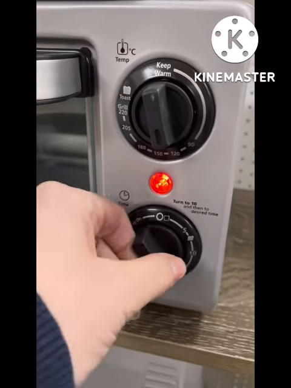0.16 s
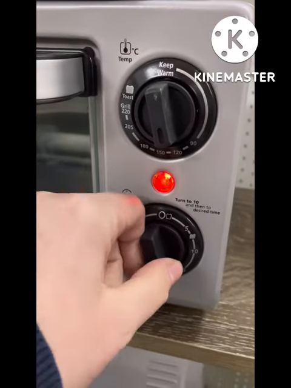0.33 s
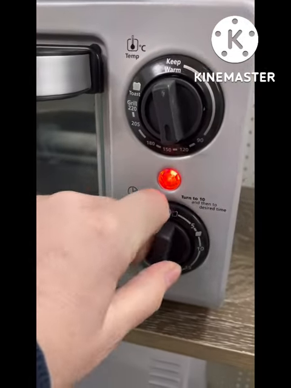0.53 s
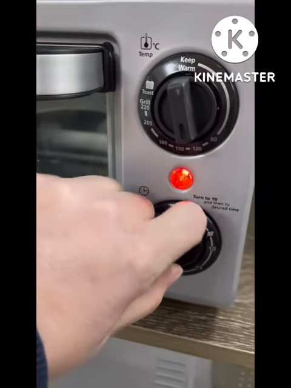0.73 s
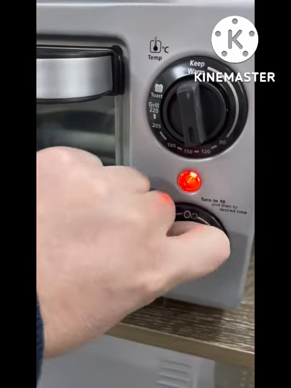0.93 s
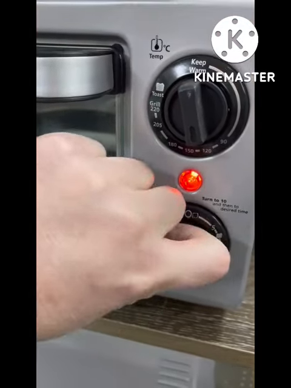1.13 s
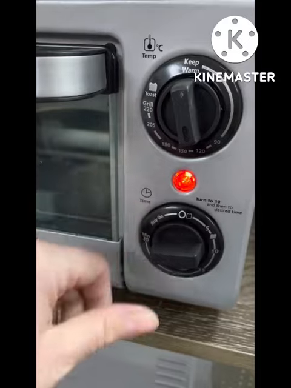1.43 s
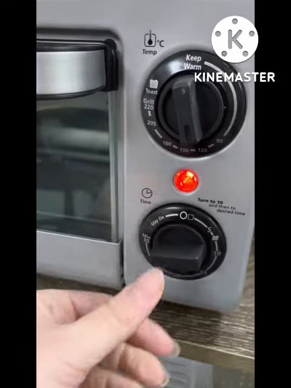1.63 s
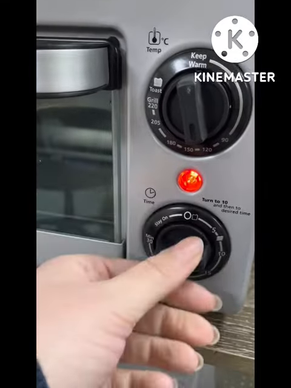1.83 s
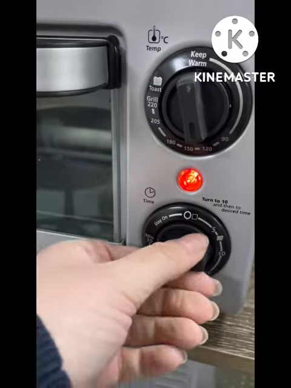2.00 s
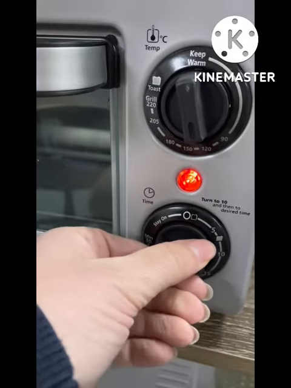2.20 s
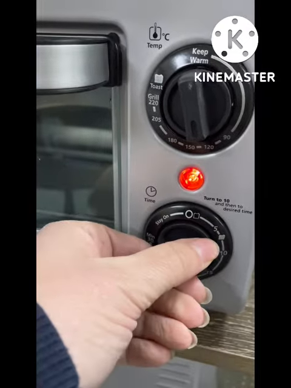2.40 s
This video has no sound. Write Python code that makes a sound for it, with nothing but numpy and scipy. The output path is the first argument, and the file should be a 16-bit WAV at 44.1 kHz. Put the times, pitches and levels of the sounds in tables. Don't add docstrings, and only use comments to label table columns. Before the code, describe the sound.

A mechanical timer knob on a small metal oven is wound in two rattling twists, ticks several times, then is forced back with two brief crunchy scrapes; close stereo microphone in a small, faintly humming room.

```python
import sys
import numpy as np
from scipy import signal
from scipy.fft import rfft, irfft
from scipy.io import wavfile
from scipy.ndimage import uniform_filter1d

SR = 44100
rng = np.random.default_rng(int(sys.argv[2]) if len(sys.argv) > 2 else 0)


def ratio_of_db(decibels):
    return 10 ** (np.asarray(decibels, float) / 20)


def put_to_file(sound):
    columns = np.atleast_2d(sound).T
    safe = np.clip(columns, -1, 1)
    whole_steps = np.round(safe * 32767)
    wavfile.write(sys.argv[1], SR, whole_steps.astype(np.int16))


N = 112454


def band(x, hz, width):
    return signal.lfilter(*signal.iirpeak(min(hz, 0.45 * SR), hz / width, fs=SR), x)


def unit(x):
    return x / np.sqrt(np.mean(x ** 2))


def shape(x, table):
    hz = np.arange(N // 2 + 1) * SR / N + 1
    rows = np.array(table)
    gain_db = np.interp(np.log(hz), np.log(rows[:, 0]), rows[:, 1])
    return irfft(rfft(x) * ratio_of_db(gain_db), N)


def settled(x, hz, width):
    twice = np.tile(x, 2)
    return unit(band(band(twice, hz, width), hz, 2 * width)[N:])


def body(x, table, grip_db=0.0):
    grip_per_s = 45
    t = np.arange(N) / SR
    total = np.zeros(N)
    for k, (hz, width, db) in enumerate(table):
        sway = 1
        if grip_db:
            sway = ratio_of_db(grip_db * np.interp(t * grip_per_s, np.arange(200), rng.standard_normal(200)))
        total += (-1) ** k * ratio_of_db(db) * band(x * sway, hz, width) * 300 / width
    return total


def metal(dull, bright, table, grip_db=0.0):
    bright_from_hz = 4800
    low = [mode for mode in table if mode[0] <= bright_from_hz]
    high = [mode for mode in table if mode[0] > bright_from_hz]
    ring = body(dull, low, grip_db) + body(bright, high, grip_db)
    crack = ratio_of_db(2) * band(bright, 7000, 8300)
    air = ratio_of_db(-13) * band(bright, 13000, 2500)
    return ring + crack + air


def clicks(times, sizes):
    out = np.zeros(N)
    places = np.clip((times * SR).astype(int), 0, N - 1)
    np.add.at(out, places.ravel(), sizes.ravel())
    return out


def rattle(table, spread_s, hold_s, scatter_db, count):
    rows = np.array(table)
    start_s, level_db, bright_db = rows[:, :1], rows[:, 1], rows[:, 2:3]
    u = rng.random((len(rows), count, 2, 4))
    late = -np.log(1 - u[..., 0]) * spread_s + u[..., 3] * hold_s
    late = late - late.min(axis=1, keepdims=True)
    size = ratio_of_db(-scatter_db * np.log(1 - u[..., 1])) * np.sign(u[..., 2] - 0.5)
    size = size / np.sqrt(np.sum(size ** 2, axis=1, keepdims=True)) * ratio_of_db(level_db)[:, None, None]
    dull = clicks(start_s + late[..., 0], size[..., 0])
    bright = clicks(start_s + late[..., 1], size[..., 1] * ratio_of_db(bright_db))
    return dull, bright


def sparse(per_s, scatter_db):
    u = rng.random((3, N))
    happens = u[0] < per_s / SR
    return unit(happens * ratio_of_db(-scatter_db * np.log(1 - u[1])) * np.sign(u[2] - 0.5))


def room_hum():
    # pitch_hz [Hz], width_hz [Hz], level_db [dB]
    hum_modes = [(39.2, 12, -62.5), (48.9, 13, -62.5), (63.65, 14.8, -52), (91.8, 18.3, -51.5),
                 (161, 18.4, -71), (213, 54, -69), (325, 440, -79.5)]
    return sum(ratio_of_db(db) * settled(rng.standard_normal(N), hz, width) for hz, width, db in hum_modes)


def room_hiss():
    # pitch_hz [Hz], level_db [dB per Hz]
    hiss_colour = [(300, -16), (600, -27), (1200, -15.5), (2500, -15), (6000, -19), (9000, -36.5),
                   (13000, -10), (16000, -11.5)]
    return ratio_of_db(-81) * unit(shape(rng.standard_normal((2, N)), [(150, -59)] + hiss_colour))


def bench(t):
    # time_s [s], level_db [dB], tilt_db [dB per resonance]
    slide = [(0.0, -16, -10), (0.038, -27, 2.5), (0.121, -21, -9.5), (0.18, -52, 2.5), (0.33, -55.5, 1.5),
             (0.41, -47.5, -1), (0.44, -58.5, 3.5), (1.25, -54, 2.5), (1.36, -76.5, 3), (2.149, -66.5, -4),
             (2.199, -50, 2), (2.471, -73, -3), (2.55, -61, 10.5)]
    # pitch_hz [Hz], width_hz [Hz], level_db [dB]
    wood_modes = [(172.4, 54, -3.5), (235, 48.5, 0), (305, 55.4, -2), (495.5, 73, -10)]
    when, level_db, tilt_db = np.array(slide).T
    tilt = np.interp(t, when, tilt_db)
    wood = sum(ratio_of_db(db + k * tilt) * settled(sparse(300, 1.74), hz, width)
               for k, (hz, width, db) in enumerate(wood_modes))
    return wood * ratio_of_db(np.interp(t, when, level_db) - 8.5)


def fading_tone(t, start_s, hz, fade_s):
    since = t - start_s
    return (since > 0) * np.exp(-np.clip(since, 0, 9) / fade_s) * np.sin(2 * np.pi * hz * since)


def housing_thumps(t):
    # start_s [s], pitch_hz [Hz], level_db [dB], ring_s [s]
    thumps = [
        (2.222, 77, -42, 0.034),
        (1.025, 210, -46, 0.0081),
        (2.512, 200, -48, 0.0085),
        (0.53, 207, -54, 0.011),
    ]
    return sum(ratio_of_db(db) * fading_tone(t, s, hz, ring_s) for s, hz, db, ring_s in thumps)


def finger_bumps(t):
    # start_s [s], level_db [dB], pitch_hz [Hz]
    knocks = [
        (.02, -40, 1450),
        (.152, -43, 880),
        (.685, -47.5, 700),
        (1.029, -44, 1190),
    ]
    return sum(ratio_of_db(db + 7.5) * fading_tone(t, s, hz, 0.0038 / 4) for s, db, hz in knocks)


def sleeve(t):
    # middle_s [s], half_length_s [s], pitch_hz [Hz], level_db [dB]
    brushes = [
        (1.217, 0.057, 870, -61),
        (1.551, 0.14, 8800, -73),
        (2.003, .13, 1130, -77),
        (1.272, 0.092, 580, -73.5),
    ]
    total = np.zeros((2, N))
    for middle_s, half_s, hz, db in brushes:
        noise = band(rng.standard_normal((2, N)), hz, hz * 0.57)
        swell = np.exp(-((t - middle_s) / half_s) ** 4)
        total += ratio_of_db(db) * swell * unit(band(noise, hz, hz))
    return total


def drags(t):
    # start_s [s], length_s [s], level_db [dB]
    scrapes = [
        (2.152, 0.014, -57),
        (2.164, 0.023, -49),
        (2.198, 0.011, -70),
        (2.51, .05, -57),
    ]
    # start_s [s], level_db [dB], brightness_db [dB]
    slips = [(2.1637, -37, 4), (2.1702, -31.5, 0), (2.1767, -27, -4.5), (2.1825, -33.5, -2),
             (2.1875, -33, 3), (2.1945, -32.5, -6), (2.207, -55, -7), (2.5135, -44, -4), (2.5189, -33.5, 3),
             (2.5254, -36, 8), (2.533, -39, 1), (2.541, -36, -7)]
    # pitch_hz [Hz], width_hz [Hz], level_db [dB]
    knob_modes = [(1160, 690, 8.5), (2176, 240, 9.5), (2447, 300, 10), (3330, 280, 6.5), (4270, 180, 0.5),
                  (5140, 1800, 5.5), (6750, 550, 16.5), (7800, 1000, -15)]
    gate = np.zeros(N)
    for start_s, length_s, db in scrapes:
        rise = np.clip((t - start_s) / 0.0053, 0, 1)
        fall = np.exp(-np.clip(t - start_s - length_s, 0, 1) / 0.0051)
        gate += ratio_of_db(db) * rise * fall
    dull, bright = rattle(slips, spread_s=0.0016, hold_s=0.001, scatter_db=2.3, count=12)
    dull = gate * sparse(6000, 2) + ratio_of_db(12) * dull
    bright = gate * sparse(6000, 2) + ratio_of_db(12) * bright
    return metal(dull, bright, knob_modes)


def escapement():
    # start_s [s], level_db [dB], brightness_db [dB]
    tick_events = [(1.1705, -50, -4), (1.1763, -30.5, -4), (1.2565, -47.5, -5), (1.2785, -38.5, -7),
                   (1.4558, -61, 1), (1.4945, -60, -17), (1.5012, -36.5, -5.5), (1.687, -70.5, 1),
                   (1.6985, -61, 3.5), (1.7179, -39.5, -6), (1.8992, -59, -0.5), (1.9365, -53, 1),
                   (1.9415, -39.5, 0), (2.3494, -63.5, -6.5), (2.4015, -51.5, -8)]
    # pitch_hz [Hz], width_hz [Hz], level_db [dB]
    plate_modes = [(1205, 540, 0), (2130, 167, -3), (2480, 120, -9), (3024, 180, -4), (3395, 175, 2),
                   (4230, 100, -6), (5330, 89, -6), (5930, 350, 11), (6760, 360, -2.5), (7480, 160, -5),
                   (7400, 300, 1), (13630, 1500, -24)]
    dull, bright = rattle(tick_events, spread_s=0.0015, hold_s=0.002, scatter_db=2.5, count=9)
    return ratio_of_db(19) * metal(dull, bright, plate_modes)


def winding():
    # start_s [s],
    # level_db [dB], brightness_db [dB]
    ratchet_teeth = [(0.0024, -26, -2), (0.0158, -33, 0.5), (0.0344, -35.5, 5.5), (0.0528, -32, -3.5),
                     (0.0687, -30.5, 0.0), (0.0814, -30, 2), (0.0994, -31.5, 4.5), (0.1214, -29.5, -2.5),
                     (0.1344, -30, 2), (0.1514, -28, 4.5), (0.1694, -26.5, -1.5), (0.1874, -31, 2),
                     (0.2184, -31.5, -0.5), (0.2404, -31, 0.5), (0.2644, -38.5, -4), (0.2982, -32.5, -1),
                     (0.3157, -34.5, -8.5), (0.3426, -30, -3), (0.3579, -53, -11), (0.3745, -31, 2.5),
                     (0.403, -28.5, -1.5), (0.4244, -33.5, 1), (0.4464, -32.5, -2), (0.4684, -32.5, -1),
                     (0.4973, -33, -1.5), (0.5257, -31.5, -4), (0.5492, -29, -5.5), (0.5754, -31.5, -4),
                     (0.5964, -35, -9),
                     (0.627, -28.5, -0.5), (0.6569, -27.5, -4.5), (0.6843, -23.5, -5), (0.7044, -32.5, 0.5),
                    (0.7304, -27.5, -4.5), (0.7445, -44, 0), (0.7677, -33.5, 0.5), (0.784, -30.5, -1),
                    (0.823, -29, 0.2), (0.85, -28, -1.7), (0.8814, -29, -2.3), (0.894, -37.5, 8),
                    (0.912, -32, -2.5), (0.9353, -28, 0.8), (0.9567, -25.5, -4), (0.9824, -33, 4.2),
                    (1.0116, -27.5, 0.5), (1.037, -38, 1), (1.0605, -34, -1.5), (1.0794, -47, -5),
                    (1.1039, -39, -1.7), (1.135, -60, -1.5), (2.1255, -50.5, 5.5)]
    # pitch_hz [Hz], width_hz [Hz], level_db [dB]
    gear_modes = [(1175, 1220, 3.5), (2076, 84, -4.5), (2111, 150, 4.5), (2270, 39, -6), (2430, 112, -1),
                  (2630, 140, -2), (3050, 150, 0.5), (3320, 71, 0), (3460, 196, 5.5), (3820, 267, 6),
                  (4250, 88, -4.5), (5390, 220, -2), (5744, 178, 6.5), (6810, 380, 3.5)]
    dull, bright = rattle(ratchet_teeth, spread_s=0.003, hold_s=0.008, scatter_db=2, count=40)
    return metal(ratio_of_db(13) * dull, ratio_of_db(10) * bright, gear_modes, grip_db=3.5)


def room(x):
    # pitch_hz [Hz], t60_s (time to fall 60 dB) [s], level_db [dB]
    echo_bands = [(700, 0.4, -7.5), (1370, 0.22, -5.5), (2550, 0.11, -15), (5200, 0.097, -15),
                  (10800, 0.11, 0)]
    build_s, fade_s = 0.0087, 0.45
    t = np.arange(SR // 2) / SR
    tail = np.zeros((2, len(t)))
    for hz, t60, db in echo_bands:
        noise = band(rng.standard_normal((2, len(t))), hz, hz)
        tail += ratio_of_db(db - 60 * t / t60) * noise / np.sqrt(t60 * hz) * 2
    tail = tail * np.clip(t / build_s, 0, 1) * np.exp(-(t / fade_s) ** 2)
    return signal.fftconvolve(x[None], tail, axes=1)[:, :N]


def casing(near):
    scatter_s = 0.0008
    fading_noise = rng.standard_normal(128) * np.exp(-np.arange(128) / SR / scatter_s)
    mid_phase = np.angle(rfft(fading_noise))
    turn = np.sign(uniform_filter1d(rng.standard_normal(len(mid_phase)), size=3))
    phases = np.array([mid_phase, mid_phase + np.pi / 2 * turn])
    return signal.fftconvolve(near[None], irfft(np.exp(1j * phases)), axes=1)[:, :N]


def microphone_ports(heard, low, hum):
    # pitch_hz [Hz], level_db [dB]
    mid_colour = [(100, 7.5), (7500, 1.5), (8900, -5), (9300, -14.5), (11400, -16), (11800, -6.5),
                  (13900, -8), (15300, -18)]
    # pitch_hz [Hz], level_db [dB]
    side_colour = [(60, -42), (300, 0.5), (600, -2.5), (4500, -2.5), (8000, 1.5), (13500, -7), (14300, -48),
                   (16000, -60)]
    # pitch_hz [Hz], width_hz [Hz], level_db [dB]
    left_lean = [(820, 540, -11)]
    clear = shape(heard[0], mid_colour)
    mid = clear + low
    side = shape(heard[1] + hum[::-1] + 0.031 * low, side_colour)
    side = side + body(clear, left_lean) * 3.2
    return np.array([mid + side, mid - side])


def scene():
    t = np.arange(N) / SR
    hum = room_hum()
    low = hum + housing_thumps(t) + bench(t)
    knocks = finger_bumps(t)
    ticks = escapement()
    near = shape(winding() + ticks + drags(t), [(250, -1), (600, 0)])
    echo = room(near - 0.19 * ticks + 0.4 * knocks)
    heard = casing(near) + knocks + echo + room_hiss() + sleeve(t)
    return microphone_ports(heard, low, hum)


def top_cut(x):
    return signal.sosfilt(signal.butter(12, 16050, fs=SR, output="sos"), x)


def record(dry):
    top_hz = 15900
    low_pass = signal.ellip(8, 0.2, 70, top_hz, fs=SR, output="sos")
    return top_cut(signal.sosfilt(low_pass, dry))


dry = scene()
out = record(dry)
put_to_file(out)
```